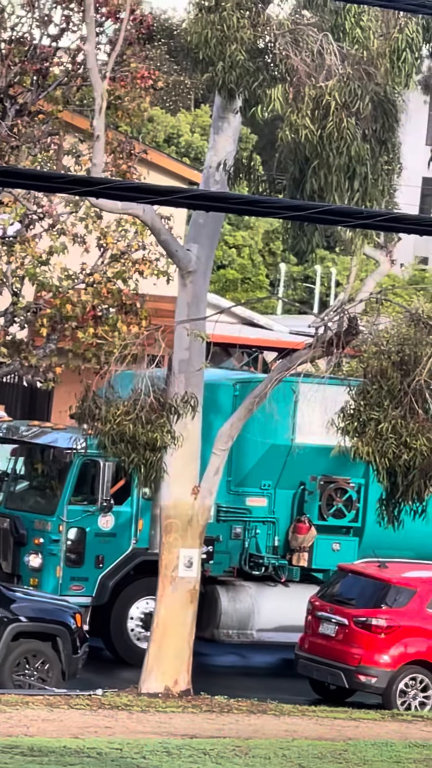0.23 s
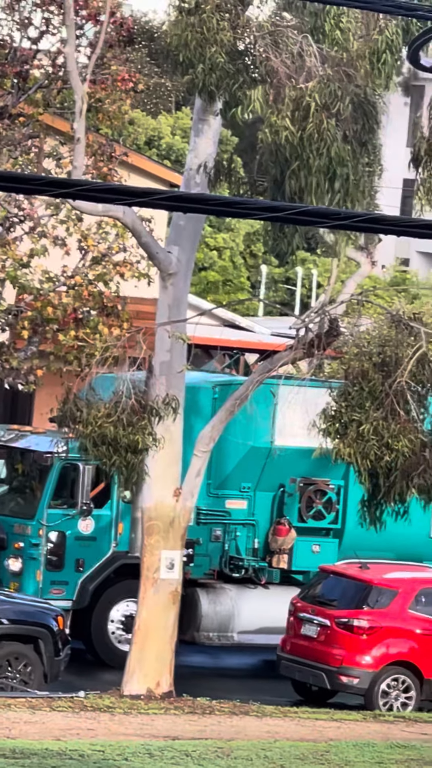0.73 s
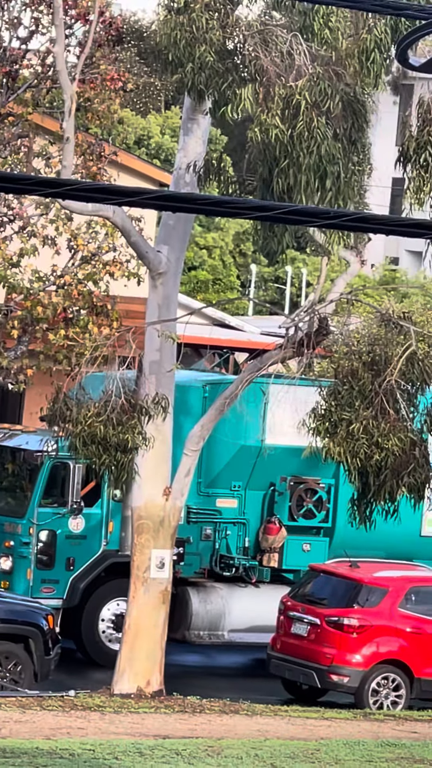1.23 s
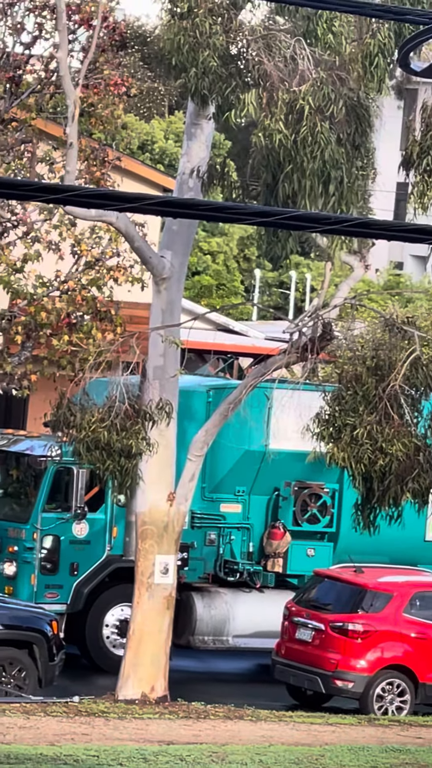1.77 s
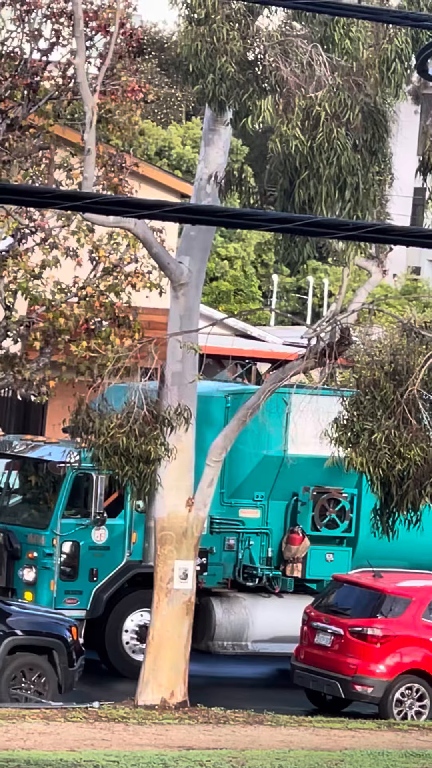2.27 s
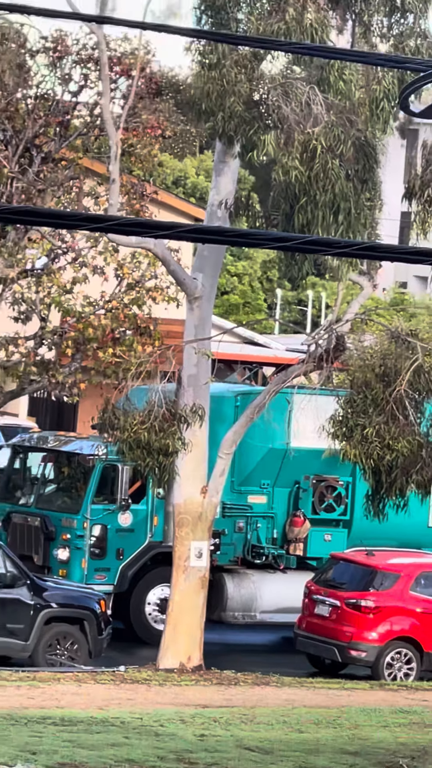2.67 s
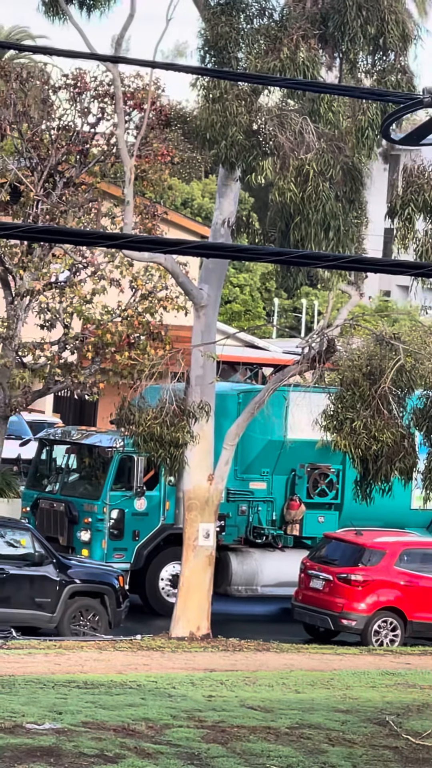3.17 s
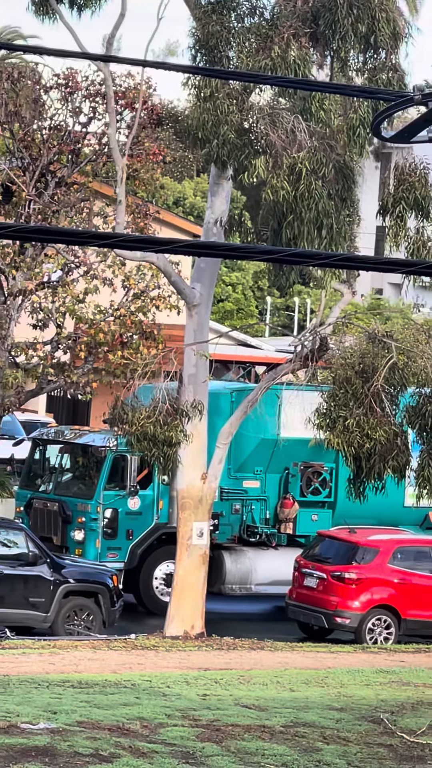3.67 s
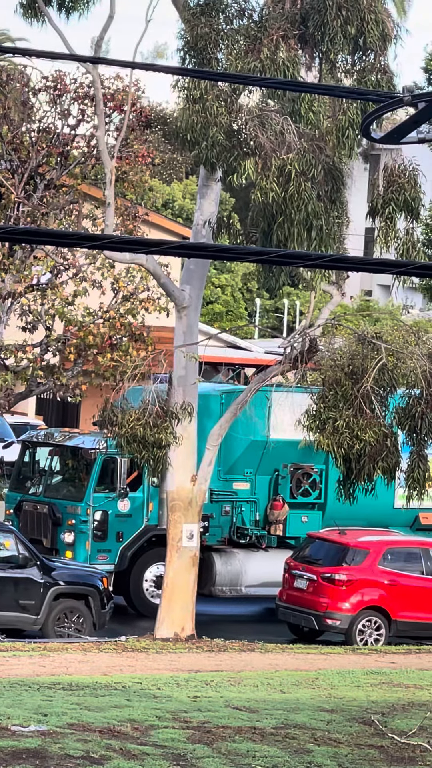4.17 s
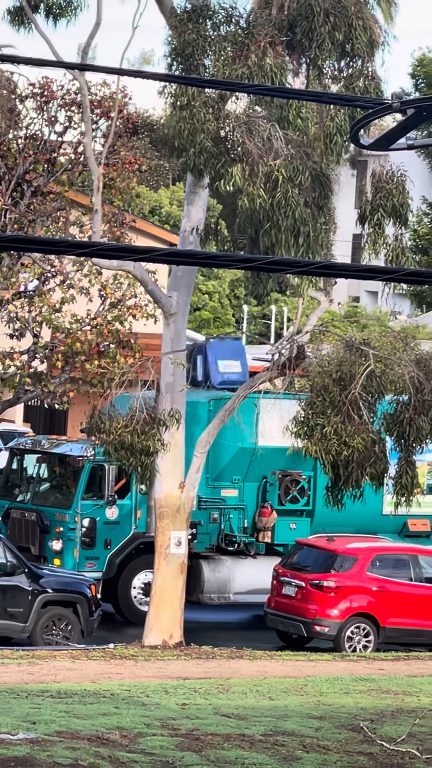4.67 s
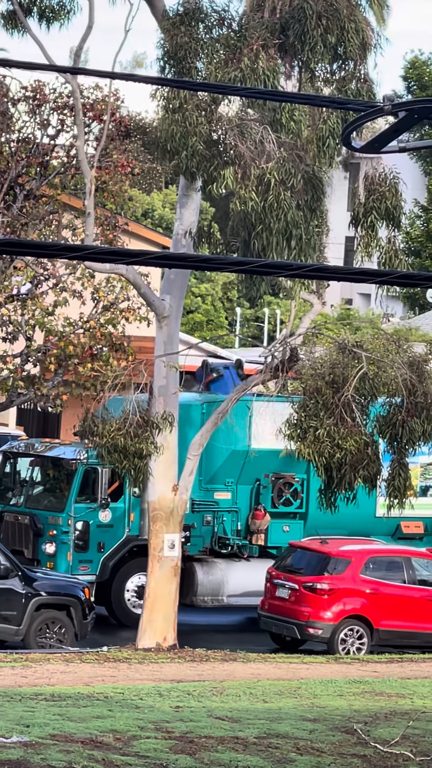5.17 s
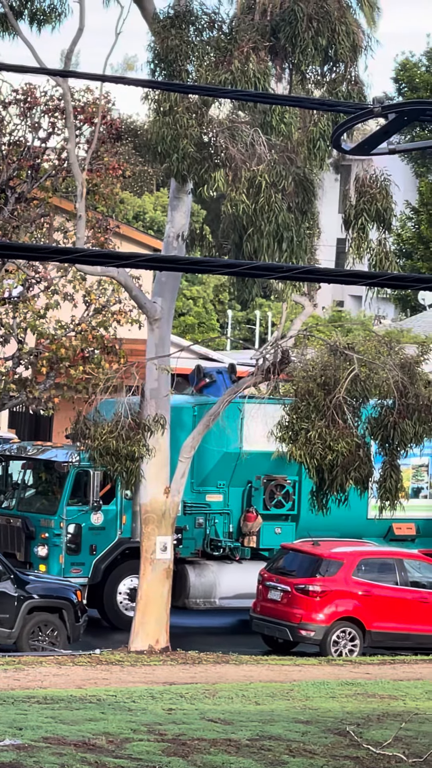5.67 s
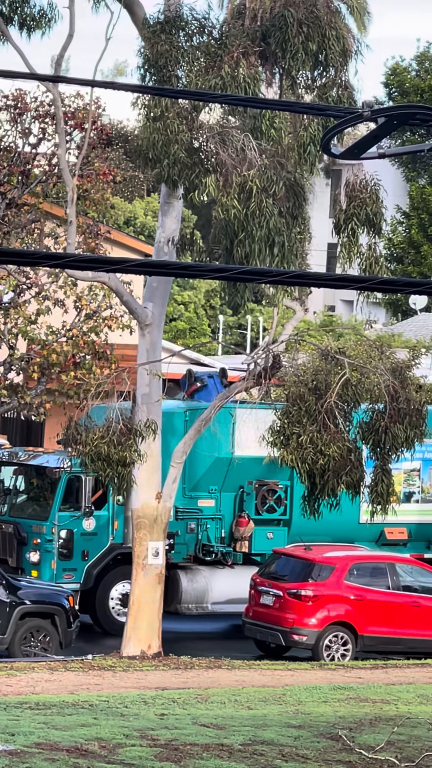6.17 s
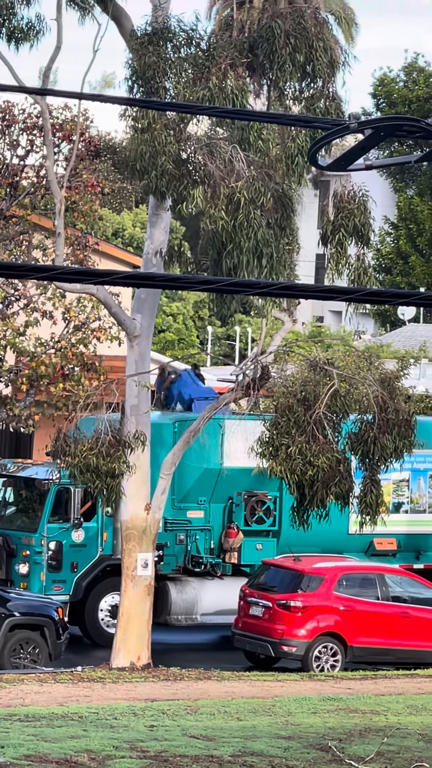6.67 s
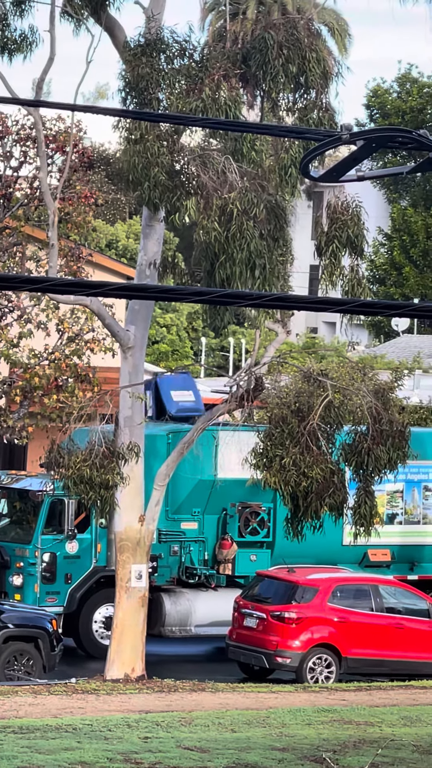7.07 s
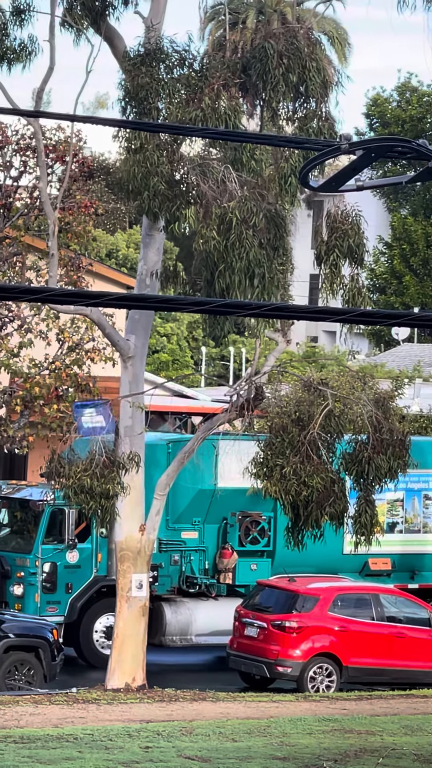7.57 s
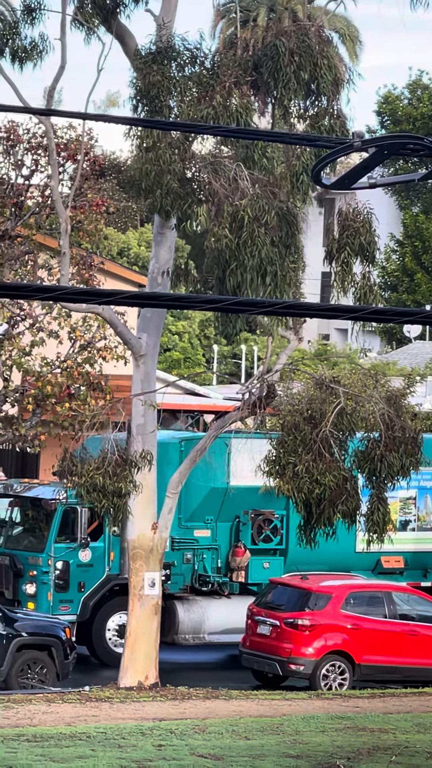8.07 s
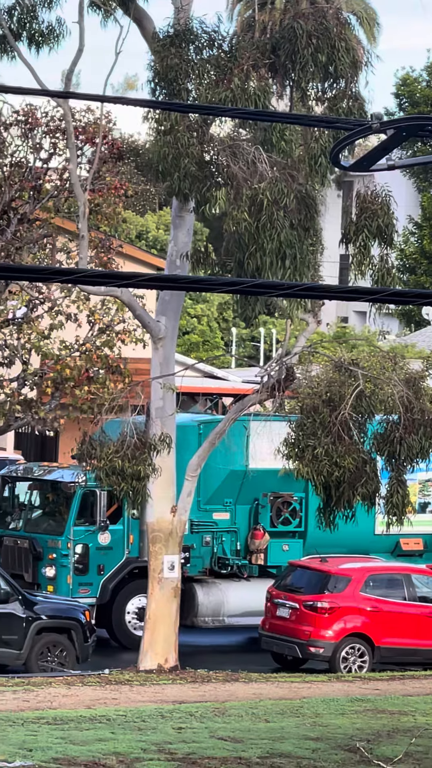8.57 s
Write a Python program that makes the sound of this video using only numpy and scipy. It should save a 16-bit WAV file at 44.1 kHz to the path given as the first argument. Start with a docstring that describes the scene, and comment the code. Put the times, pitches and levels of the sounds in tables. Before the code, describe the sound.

Steady truck engine rumble and rattling panels in the open street, heard from the opposite side by a close-spaced stereo pair. Brief brake squeak and air hisses, tyres rolling past, scattered metallic knocks. A car accelerates through the middle, then a hollow crash in mid-clip; later the pump whirrs again and a cluster of heavy clanks marks the bin landing, before the engine drones on.

```python
"""A busy street in the open air, heard from across the road by two close microphone ports.
A side-loading recycling truck lifts, tips and sets down a bin: engine orders form its diesel drone,
narrow noise resonances and fuzzy tones its whirr and hum, and bursts of noise, ringing modes and
thuds the clanks at the top and the slam of the bin. Cars roll by as swelling bands of noise; the exhaust
note of one that pulls away rises and then falls."""
import sys
import numpy as np
from scipy import signal
from scipy.fft import rfft, irfft
from scipy.io import wavfile

SR = 44100
rng = np.random.default_rng(int(sys.argv[2]) if len(sys.argv) > 2 else 0)


def file_out(sig):
    """Save sig as 16-bit WAV at sys.argv[1]."""
    # one column per channel
    cols = np.atleast_2d(sig).T
    # limit, then scale
    lim = np.clip(cols, -1, 1)
    pcm = np.round(lim * 32767).astype(np.int16)
    wavfile.write(sys.argv[1], SR, pcm)


N = 388515
TIME, HZ = np.arange(N) / SR, np.fft.rfftfreq(N, 1 / SR)

# Truck diesel: t/s, firing rate f/Hz, level of the firing note before its trim/dB
DIESEL_TRACK = [(0, 46, -40.5), (.3, 47.7, -44), (.45, 59.5, -34), (1.25, 59.4, -32.5), (1.5, 60.8, -37),
                (1.9, 72.9, -32.5), (3.15, 76, -33), (3.7, 70, -34), (5, 69.86, -50), (5.6, 70.5, -34),
                (6, 69.98, -51), (6.6, 70.9, -34), (7.3, 65.8, -39.5), (8.25, 64, -32), (8.55, 63.6, -28.5),
                (8.81, 61.8, -30)]
# Truck engine orders: multiple of the firing rate, relative level/dB
DIESEL_ORDERS = [(1, -3), (1.5, -9.5), (2, -19), (3, -14), (4, -17)]
# Working machinery, steady after the last point: t/s, level before each layer's trim/dB
WORK_LEVEL = [(0, -39), (.35, -33.5), (1.4, -37), (1.9, -34.5), (2.5, -38), (3.3, -39), (4.25, -36),
              (5.4, -38), (6.15, -43.5), (6.6, -37.5), (7.2, -38.5), (8, -35.5)]
# Colour of the clatter: f/Hz, relative level per Hz/dB
CLATTER_SPECTRUM = [(400, -17.5), (900, -5), (1250, -0.5), (1500, 2.5), (1780, 1.5), (2050, -2.5),
                    (2600, -7.5), (3500, -14.5), (4500, -21), (6000, -22.5), (8000, -20.5), (12000, -109)]


def diesel():
    """Exhaust orders follow the firing rate, and mechanical clatter pulses lightly with each firing."""
    firing_hz, note_db = curves(DIESEL_TRACK)
    turns = np.cumsum(firing_hz * (1 + 0.0096 * wander(10.86))) / SR
    note = gain_of(note_db - 2.5) * exhaust(turns, DIESEL_ORDERS, waver_db=2.1)
    firing = evened(1 + 0.067 * np.cos(2 * np.pi * turns))
    work_db, = curves(WORK_LEVEL)
    clatter_gain = gain_of(work_db + 0.36 + 0.5 * wander(36))
    clatter = clatter_gain * firing * noise(gain_of(read(CLATTER_SPECTRUM, HZ)))
    return note + clatter


# Blows of the arm and bin: t/s, level before the layer trims/dB, crash t60/s,
# low thud and bright contact against the blow, before their trims/dB
BLOWS = [(.567, -28, .1, -38, -11.5), (1.671, -28.5, 0.66, -26, -16), (2.765, -32, .25, -25, -16),
         (2.799, -31.5, 0.187, -30, -3), (2.835, -35.5, 0.46, -28, -20), (4.432, -33.5, .15, -30, -14),
         (4.48, -30, 0.17, -37.5, -8), (5.241, -25.5, .085, -15, -12), (5.266, -31.5, 0.12, 1, -5.5),
         (5.279, -35, 0.6, 1, -17), (5.33, -36, 0.26, -15, -21), (7.543, -24.5, 0.16, -21, -6.5),
         (7.571, -27.5, 0.35, -8, -3), (7.592, -27, 0.33, 3.5, -1), (7.617, -25, 0.28, -1, -11),
         (7.652, -28.5, 0.25, -12, -9), (7.674, -31, 0.33, 5.5, -8), (7.712, -28.5, 0.15, -15, -21),
         (7.739, -37, .22, -2, -24), (7.891, -35, .12, -15, -24), (7.939, -37, 0.32, -14, -15.5),
         (8.129, -31.5, 0.29, -3.5, -11.5)]
# Ring of the steel arm and hopper: nominal f/Hz, relative level/dB, t60/s
STEEL_MODES = [(253, -9, 0.86), (423, 0, 0.59), (555, -10, 0.92), (740, 1.5, 0.45), (822, -1, .6),
               (1275, 0, 0.43), (1685, -5, 0.57), (1820, -6, .4), (2530, -11, .4), (2710, -11, 0.5),
               (3645, -13, 0.3)]
# Colour of the crash: f/Hz, relative level per Hz/dB
CRASH_SPECTRUM = [(40, -25), (100, 5), (170, 4.5), (400, 6), (800, 3), (1200, -1), (1800, -2), (2700, -3),
                  (3700, -10), (4600, -7), (5600, -12), (10000, -24), (12000, -24)]
# Bright chink where metal meets metal: f/Hz, relative level per Hz/dB
CONTACT_SPECTRUM = [(1500, -30), (3300, 1.5), (4600, -12.5), (5600, -3), (7200, 2), (9000, -5),
                    (10700, 2.5), (12000, -7)]
CONTACT_T60_S, THUD_HZ, THUD_T60_S = 0.22, 98, 0.17  # each thud is detuned a little from THUD_HZ


def arm():
    """Each blow gives a bright contact, a jangling crash, lasting steel modes and a hollow bin's thud."""
    contact, crash, ring, thud = np.zeros((4, N))
    t = np.arange(SR) / SR
    for start_s, db, crash_t60_s, thud_db, contact_db in BLOWS:
        at = round(start_s * SR)
        blow = gain_of(db) * (1 - np.exp(-t / 0.0017))  # soft onset
        modes = np.zeros(SR)
        for hz, mode_db, t60_s in STEEL_MODES:
            turns = hz * rng.uniform(0.98, 1.015) * t + rng.random()
            modes += gain_of(mode_db - 60 * t / t60_s) * np.sin(2 * np.pi * turns)
        thud_turns = THUD_HZ * rng.uniform(0.93, 1.09) * t
        boom = gain_of(thud_db - 60 * t / THUD_T60_S) * np.sin(2 * np.pi * thud_turns)
        chink = gain_of(contact_db - 60 * t / CONTACT_T60_S)
        decay = gain_of(-60 * t / crash_t60_s)
        for track, sound in (contact, chink), (crash, decay), (ring, modes), (thud, boom):
            track[at:at + SR] += (blow * sound)[:N - at]
    crash_noise = crash * noise(gain_of(read(CRASH_SPECTRUM, HZ)))
    contact_noise = contact * noise(gain_of(read(CONTACT_SPECTRUM, HZ)))
    metal = gain_of(-2.0) * (crash_noise + gain_of(-7.5) * contact_noise) * chatter()
    return metal + jangle(crash) + gain_of(-10.5) * ring + gain_of(7.5) * thud


CHATTER_PER_S, CHATTER_T60_S = 420, 0.02
CHATTER_SHARE = 0.27  # share of the crash's power that chatters


def chatter():
    """The bin and the gripper knock together many times within a crash, as dense random decays."""
    knocks = (rng.random(N) < CHATTER_PER_S / SR) * rng.uniform(0.33, 3.1, N)
    decay = gain_of(-60 * TIME[:SR] / CHATTER_T60_S) ** 2
    power = abs(signal.oaconvolve(knocks, decay)[:N])
    return np.sqrt(1 - CHATTER_SHARE + CHATTER_SHARE * power / power.mean())


JANGLE_PER_S, JANGLE_T60_S, JANGLE_DB = 380, 0.06, -6.5
JANGLE_LOW_HZ, JANGLE_HIGH_HZ, JANGLE_TILT_DB_PER_OCTAVE = 699, 4300, -3.5


def jangle(shaking, count=24):
    """Loose links and brackets, each with its own pitch, ring briefly as a blow shakes them."""
    t, out = TIME[:SR // 8], np.zeros(N)
    for hz in np.geomspace(JANGLE_LOW_HZ, JANGLE_HIGH_HZ, count):
        knocks = (rng.random(N) < JANGLE_PER_S / count / SR) * rng.uniform(0.3, 1.44, N)
        tone = np.sin(2 * np.pi * hz * rng.uniform(0.95, 1.04) * t)
        ring = gain_of(-60 * t / JANGLE_T60_S) * tone
        tilt = gain_of(JANGLE_TILT_DB_PER_OCTAVE * np.log2(hz / JANGLE_LOW_HZ))
        ring *= tilt / np.linalg.norm(ring)
        out += signal.oaconvolve(knocks * shaking, ring)[:N]
    return gain_of(JANGLE_DB) * np.sqrt(SR / JANGLE_PER_S) * out


# Resonances of the pump: f/Hz, half width f/Hz, relative level/dB
PUMP_RINGS = [(804, 16, -1.5), (757, 22, -3.5), (680, 42, -7)]
PUMP_IDLE_DB = -51.5
PUMP_SWAY, PUMP_SWAY_PER_S = 0.014, 5  # the whirr wavers with the load: rms share of pitch, rate


def pump():
    """The hydraulic whirr: noise in narrow resonances, drifting in pitch and louder in each stroke."""
    whirr = swaying(ringing(PUMP_RINGS), PUMP_SWAY, PUMP_SWAY_PER_S)
    return np.hypot(gain_of(PUMP_IDLE_DB), pump_effort()) * whirr


# Strokes of the hydraulic pump: start t/s, length t/s, level/dB
PUMP_STROKES = [(-.4, 1.08, -37), (6.444, 2.6, -37.5)]


def pump_effort():
    """The level of all strokes of the pump."""
    return sum(stroke_level(*row) for row in PUMP_STROKES)


STROKE_RAMP_S = 0.14


def stroke_level(start_s, length_s, db):
    """A stroke or tone ramps up, holds and ramps down."""
    to_edge_s = np.minimum(TIME - start_s, start_s + length_s - TIME)
    return gain_of(db) * np.clip(to_edge_s / STROKE_RAMP_S, 0, 1)


# Tones of the hydraulic pump and a humming body panel (545 Hz):
# start t/s, length t/s, starting f/Hz, rise/(Hz per s), level/dB
PUMP_AND_PANEL_TONES = [(-.2, 0.66, 815, 10.2, -35.5), (6.66, 0.53, 802, 20, -36.5),
                        (7.25, .4, 765, 40, -39), (7.0, 1.25, 810, 60, -41.5), (6.5, .42, 545, 0.5, -40),
                        (6.5, 0.55, 905, 130, -39)]
TONE_WAVER = 0.0065  # rms share of the pitch
TONE_FUZZ = 0.27  # noisy share of a tone's power


def unsteady_tone(start_s, length_s, start_hz, rise_hz_per_s, db):
    """An unsteady tone holds or climbs, with random flutter of level and phase to make it fuzzy."""
    hz = (start_hz + rise_hz_per_s * (TIME - start_s)) * (1 + TONE_WAVER * wander(14.2))
    fuzz = np.sqrt(TONE_FUZZ / 2) * (wander(22) + 1j * wander(22))
    flutter = np.sqrt(1 - TONE_FUZZ) + fuzz
    tone = (flutter * np.exp(2j * np.pi * np.cumsum(hz) / SR)).real
    return stroke_level(start_s, length_s, db) * tone


# Body panels shaken by the engine: f/Hz, half width f/Hz, relative level/dB
PANEL_RINGS = [(120.2, 5.33, 6.5), (254.6, 7.6, 2.5), (303.6, 6.5, -2.5), (385.5, 9.6, 1), (424, 10.3, -1),
               (551, 12, -.5), (631, 11.8, 0), (687.4, 11, 1.5), (870, 11.9, -0.5), (941, 11, -8),
               (1070, 10.5, -6.5), (1236, 13, -7.5), (1520, 19, -6.5), (1723, 20, -8)]
PANELS_IDLE_DB, PANELS_LOAD_DB = -38.5, -1.5  # idle level; loaded level against the pump effort


def panels():
    """Body panels hum at their own resonances at idle, and harder with the pump."""
    level = np.hypot(gain_of(PANELS_IDLE_DB), gain_of(PANELS_LOAD_DB) * pump_effort())
    return level * ringing(PANEL_RINGS)


def rattle():
    """Small loose parts tick at random as short noise decays, following the machinery's level."""
    strength = gain_of(3 * np.minimum(rng.exponential(1, N), 2.6))
    knocks = (rng.random(N) < 14 / SR) * strength  # 14 per second on average
    fading = signal.oaconvolve(knocks, gain_of(-60 * TIME[:SR] / 0.057))[:N]
    work_db, = curves(WORK_LEVEL)
    return gain_of(work_db - 8) * fading * noise(gain_of(read(CLATTER_SPECTRUM, HZ)))


# Short airy hisses and a breathy squeak (5586 Hz):
# start t/s, length t/s, level/dB, centre f/Hz, half width f/Hz
AIRY_SOUNDS = [(0.123, 0.32, -43.5, 10800, 1019), (.1, 0.56, -54, 7000, 4300),
               (2.616, 0.39, -43.5, 6400, 4200), (2.626, 0.093, -48, 5586, 230),
               (2.78, 0.162, -44, 3480, 650), (2.783, 0.036, -43.5, 10300, 1200),
               (3.1, 1.3, -56, 11100, 800), (7.221, 0.064, -58.5, 10990, 900),
               (8.55, 0.37, -54, 6540, 5050)]
# Brake squeaks: start t/s, length t/s, f/Hz, level/dB
BRAKE_SQUEAKS = [(-.08, 0.35, 7515, -48), (-.08, 0.24, 7181, -56), (2.98, .045, 7030, -46)]
SQUEAK_WAVER = 0.0035  # rms share of the pitch


def hisses_and_squeaks():
    """Soft puffs of air and a breathy squeak are bands of noise; brake pad squeaks are wavering sines."""
    def swell(start_s, length_s):
        return np.sin(np.pi * np.clip((TIME - start_s) / length_s, 0, 1))

    out = np.zeros((2, N))
    for start_s, length_s, db, hz, width_hz in AIRY_SOUNDS:
        out += gain_of(db) * swell(start_s, length_s) * noise(resonance(hz, width_hz))
    for start_s, length_s, hz, db in BRAKE_SQUEAKS:
        turns = np.cumsum(hz * (1 + SQUEAK_WAVER * wander(160))) / SR
        out += gain_of(db) * swell(start_s, length_s) * np.sin(2 * np.pi * turns)
    return out


# Exhaust of a car rolling past: t/s, firing rate f/Hz, level before throb and trims/dB
CAR_ROLLING = [(0, 93.9, -41), (.7, 95.7, -34.5), (.9, 77.9, -32.5), (1.2, 76, -56)]
# Exhaust of a car that pulls away and shifts up: t/s, firing rate f/Hz, level before throb and trims/dB
CAR_LEAVING = [(2.43, 77, -28), (2.53, 79.16, -26.5), (2.75, 85.9, -43), (3.14, 82.95, -34),
               (3.35, 97.8, -31), (3.65, 105.9, -47), (3.85, 111, -37), (4, 114, -38), (4.17, 117.7, -32),
               (4.47, 122, -30), (4.75, 125.9, -31), (5.03, 127.9, -28), (5.17, 122.9, -34.5),
               (5.3, 111.7, -34), (5.39, 99.5, -24), (5.5, 98, -35), (5.62, 97.9, -44)]
# Car engine orders: multiple of the firing rate, relative level/dB
CAR_ORDERS = [(1, -1), (1.5, -21), (2, -12)]
THROB_PER_S, THROB_DB, THROB_PEAK_S = 3.68, 4, 4.74  # the note swells and sinks by this much either way
BURBLE_DB, BURBLE_HZ, BURBLE_WIDTH_HZ = -14, 190, 70  # tailpipe gas, level against the car's track


def car(rows):
    """A throbbing exhaust note follows the engine speed, with a noisy puff of gas at each firing."""
    firing_hz, db = curves(rows)
    to_edge_s = np.minimum(TIME - rows[0][0], rows[-1][0] - TIME)
    sounding = np.clip(to_edge_s / 0.086, 0, 1)
    throb_db = THROB_DB * np.cos(2 * np.pi * THROB_PER_S * (TIME - THROB_PEAK_S))
    turns = np.cumsum(firing_hz * (1 + 0.0109 * wander(12.0))) / SR
    note = gain_of(throb_db - 1.8) * exhaust(turns, CAR_ORDERS, waver_db=1.0)
    puffing = evened(1 + 0.6 * np.cos(2 * np.pi * turns))
    burble = gain_of(BURBLE_DB) * puffing * noise(resonance(BURBLE_HZ, BURBLE_WIDTH_HZ))
    return sounding * gain_of(db) * (note + burble)


# Tread notes of passing tyres: loudest at t/s, half width t/s, level/dB, centre f/Hz, half width f/Hz
TREAD_NOTES = [(.2, .15, -31.5, 698, 55), (.27, 0.13, -39, 835, 35), (1.08, 0.19, -31, 858, 45),
               (1.2, 0.19, -36, 745, 30), (.92, .16, -37, 800, 40), (1.62, 0.16, -36, 795, 35),
               (1.8, .3, -40, 1125, 35)]


def tread_hum(peak_s, width_s, db, hz, width_hz):
    """The tread pattern of a passing tyre gives a fuzzy note that swells and fades."""
    swell = 1 / (1 + ((TIME - peak_s) / width_s) ** 2)
    return gain_of(db) * swell * noise(resonance(hz, width_hz))


# Passing vehicles: nearest at t/s, time scale of the pass t/s, then levels before the layer trims:
# tyre roar/dB, road rush/dB, body rumble/dB, gritty hiss/dB
VEHICLE_PASSES = [(.23, 0.56, -30.5, -37.5, -32, -54.5), (1.15, 0.45, -34.5, -34, -48, -56.5),
                  (1.85, 0.6, -35, -43, -33.5, -57), (2.6, -0.1, -46, -34, -42, -72),
                  (3.5, 0.6654, -33, -35.5, -34, -55.5), (4.199, 0.35, -49, -51, -36, -54),
                  (5.6, 0.5, -40.5, -54, -36, -82), (7.9, 0.32, -40, -36, -38.5, -60.5),
                  (8.66, 0.3031, -44, -35, -37.5, -57.5)]
# Colours of the four layers: f/Hz, relative level per Hz/dB
RUMBLE_SPECTRUM = [(20, -50), (30, -23), (45, -10), (62, -6.5), (85, 1.5), (115, -4.5), (150, -3.5),
                   (200, -3), (285, -3), (340, -5.5), (400, -11), (500, -28), (700, -68)]
ROAD_SPECTRUM = [(250, -27), (340, -3), (420, 5), (520, 6), (650, 2.5), (760, -6.5), (1000, -40)]
TYRE_SPECTRUM = [(300, -29), (480, -14.5), (620, -8), (730, -1.5), (860, -0.5), (1100, -3.5), (1400, -8),
                 (2000, -17.5), (3000, -25), (5000, -37.5), (9000, -55)]
HISS_SPECTRUM = [(1500, -20), (3000, 7), (4600, 6.5), (6000, 3.5), (8500, -11.5), (10000, 1.5),
                 (10900, 4.5), (11600, -4), (12400, -20)]
# Distant traffic, before the layer trims
FAR_RUMBLE_DB, FAR_ROAD_DB, FAR_TYRES_DB, FAR_HISS_DB = -39, -46.5, -41, -72


def traffic():
    """Body rumble, wheels rushing on asphalt, tread roar and gritty hiss, each a flickering noise band."""
    _, _, tyre_db, road_db, rumble_db, hiss_db = np.transpose(VEHICLE_PASSES)
    rumble = passing(rumble_db, FAR_RUMBLE_DB, falloff=1.0) * gain_of(1.58 + 0.5 * wander(5.4))
    road = passing(road_db, FAR_ROAD_DB, falloff=1.24) * gain_of(1.74 * wander(6.5))
    tyres = passing(tyre_db, FAR_TYRES_DB, falloff=0.95) * gain_of(1.5 + 0.5 * wander(9.4))
    hiss_flicker_db = 0.55 * wander(90) + 0.5 * wander(14.0)
    hiss = passing(hiss_db, FAR_HISS_DB, falloff=1.297) * gain_of(9.5 + hiss_flicker_db)
    layers = ((rumble, RUMBLE_SPECTRUM), (road, ROAD_SPECTRUM),
              (tyres, TYRE_SPECTRUM), (hiss, HISS_SPECTRUM))
    return sum(level * noise(gain_of(read(spectrum, HZ))) for level, spectrum in layers)


def passing(levels_db, far_db, falloff):
    """Vehicles swell and fade with their distance, over the steady level of distant traffic."""
    power = gain_of(far_db) ** 2
    for (nearest_s, scale_s, *_), db in zip(VEHICLE_PASSES, levels_db):
        power = power + gain_of(db) ** 2 / (1 + ((TIME - nearest_s) / scale_s) ** 2) ** falloff
    return np.sqrt(power)


def exhaust(turns, orders, waver_db):
    """Engine orders are sines at multiples of the firing rate, each wavering a little in level."""
    note = np.zeros(N)
    for multiple, db in orders:
        level = np.sqrt(2) * gain_of(db + waver_db * wander(11))
        note += level * np.sin(2 * np.pi * (multiple * turns + rng.random()))
    return note


def ringing(rings):
    """Steady shaking heard through narrow resonances."""
    return noise(sum(gain_of(db) * resonance(hz, width_hz) for hz, width_hz, db in rings))


def resonance(hz, width_hz):
    """Gain of a resonance, halved at width_hz either side of its centre."""
    return 1 / (1 + ((HZ - hz) / width_hz) ** 2)


def swaying(x, depth, rate_hz):
    """Lets the pitch drift up and down by reading the sound at a wavering speed."""
    place = np.arange(N) + np.cumsum(depth * wander(rate_hz))
    return np.array([np.interp(place % N, np.arange(N), side) for side in x])


# Likeness of a wide source at the two microphone ports: f/Hz, correlation (0 to 1)
PORT_LIKENESS = [(100, 1), (300, .98), (600, .89), (1100, .87), (1700, .98), (4000, .94), (7000, .93),
                 (9000, .97), (12000, .92)]


def noise(gain):
    """Coloured noise of rms 1 from a wide source, partly alike at the two ports."""
    left, other = rfft(rng.standard_normal((2, N)))
    same = np.clip(read(PORT_LIKENESS, HZ), 0, 1)
    right = same * left + np.sqrt(1 - same ** 2) * other
    return evened(irfft(np.array([left, right]) * gain, N))


def wander(rate_hz):
    """Slow random motion of rms 1: noise kept below about rate_hz."""
    return evened(irfft(rfft(rng.standard_normal(N)) / (1 + (HZ / rate_hz) ** 4), N))


def gain_of(db):
    """Decibels to amplitude."""
    return 10 ** (np.asarray(db) / 20)


def evened(x):
    """Scales to rms 1."""
    return x / np.sqrt(np.mean(x ** 2) + 1e-20)


def read(points, hz):
    """A spectrum joined on a log-frequency axis."""
    f, value = np.transpose(points)
    return np.interp(np.log(hz + 1), np.log(f + 1), value)


def curves(rows):
    """Each column of a table at every sample."""
    s, *columns = np.transpose(rows)
    return [np.interp(TIME, s, column) for column in columns]


def scene():
    """The truck with its pump, arm and loose parts, and the traffic around it."""
    tones = sum(unsteady_tone(*row) for row in PUMP_AND_PANEL_TONES)
    lorry = diesel() + arm() + pump() + tones + panels() + rattle()
    cars = car(CAR_ROLLING) + car(CAR_LEAVING) + sum(tread_hum(*row) for row in TREAD_NOTES)
    return lorry + hisses_and_squeaks() + cars + traffic()


# Phase between the microphone ports: f/Hz, lead of the left/rad
PORT_PHASE = [(0, 0), (200, -.1), (550, -.5), (800, -.3), (1120, -.65), (1650, 0), (2600, .7), (4000, .8),
              (4600, 1.8), (4900, 3.14), (5500, 5.9), (6200, 6.4), (9000, 9.4), (12000, 12.2)]
# Level between the microphone ports: f/Hz, left minus right level/dB
PORT_TILT = [(50, 0), (120, -.55), (230, -1), (440, -1.2), (860, -2.6), (1670, .5), (3250, 0), (6320, 0),
             (12300, 0)]
EDGE_HZ = 11980  # top of the microphone's band


def record(dry):
    """The two microphone ports differ in phase and level; then a low-pass limits the band."""
    phase = np.interp(HZ, *np.transpose(PORT_PHASE))
    lean = gain_of(read(PORT_TILT, HZ) / 2)
    ports = irfft(rfft(dry) * np.array([lean, np.exp(-1j * phase) / lean]), N)
    low_pass = signal.firwin(511, EDGE_HZ, window=("kaiser", 9), fs=SR)
    return signal.oaconvolve(ports, low_pass[None], "same", axes=1)


dry = scene()
out = record(dry)
file_out(out)
```